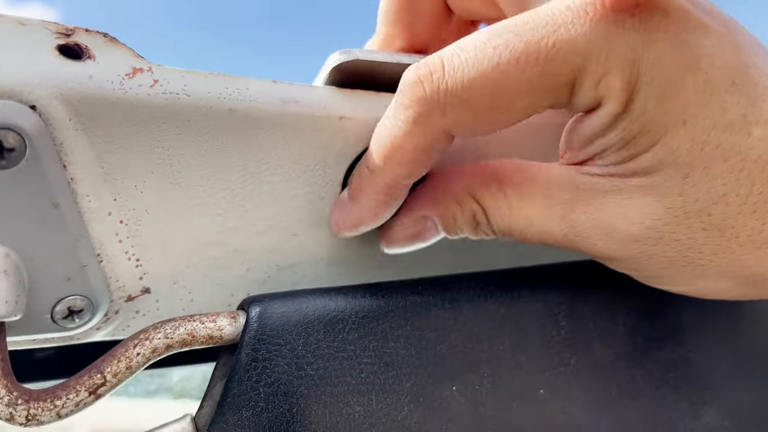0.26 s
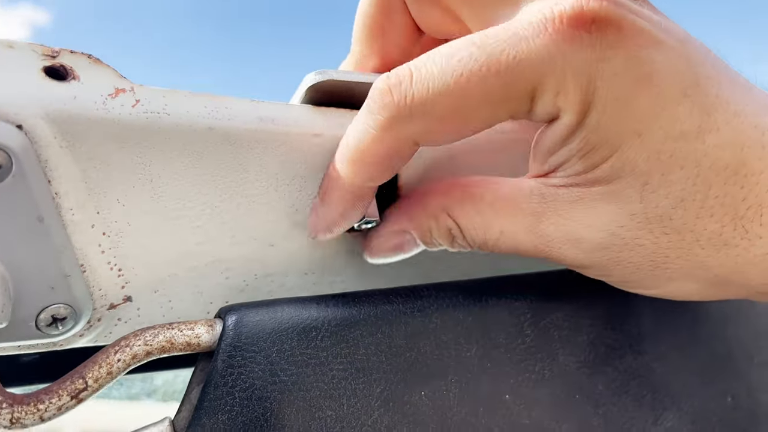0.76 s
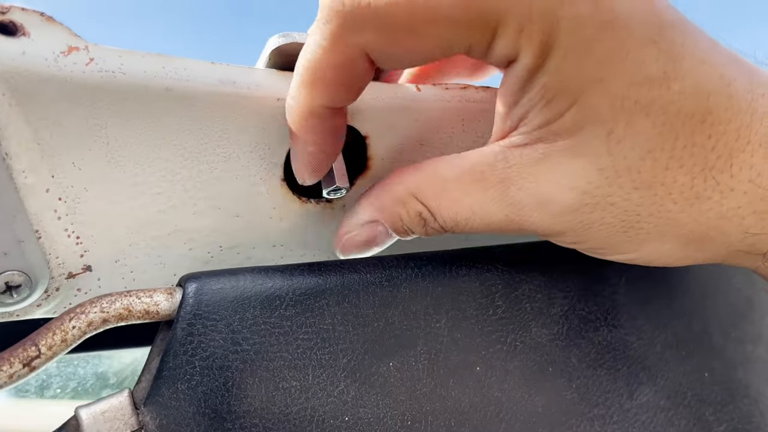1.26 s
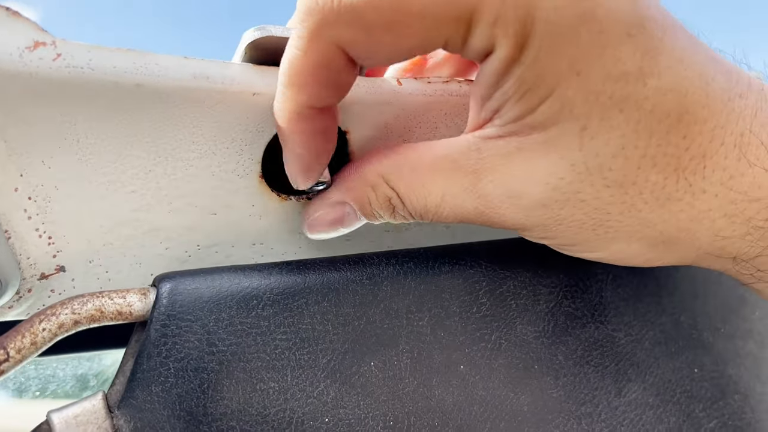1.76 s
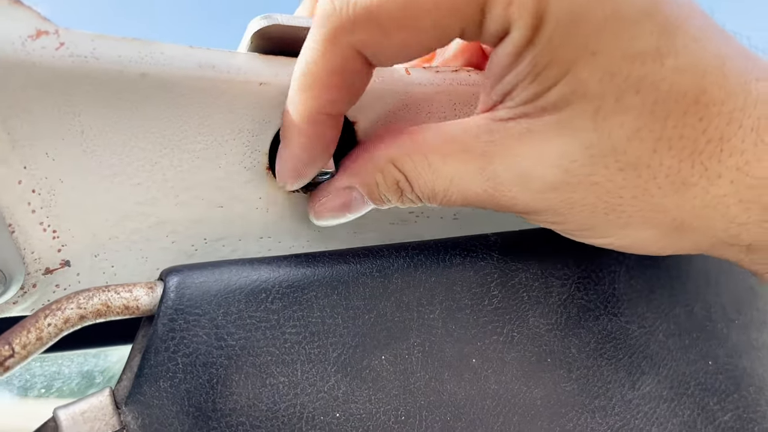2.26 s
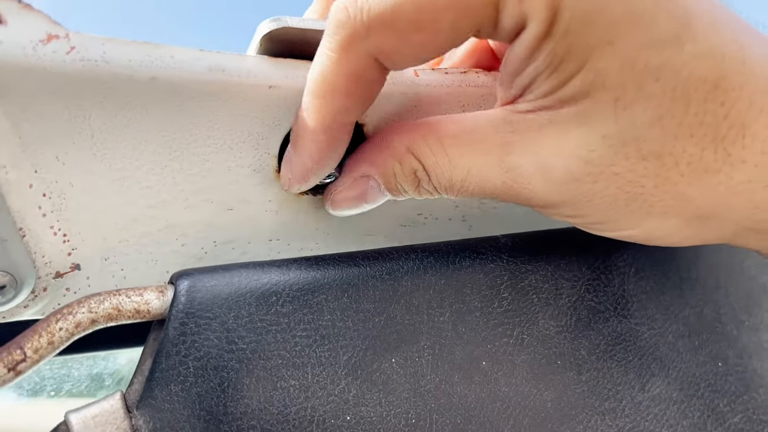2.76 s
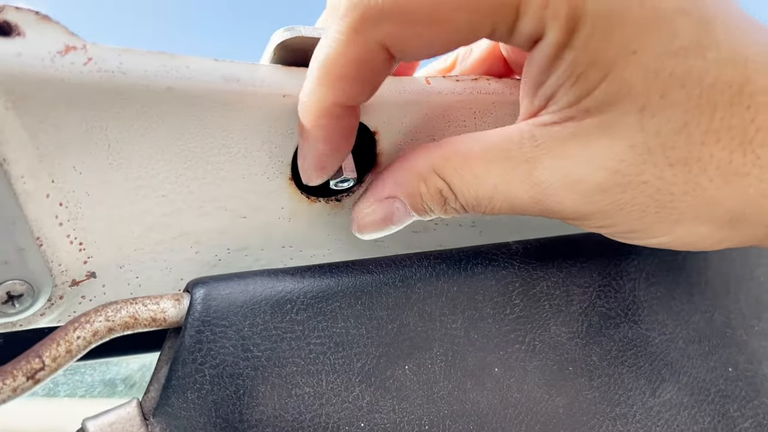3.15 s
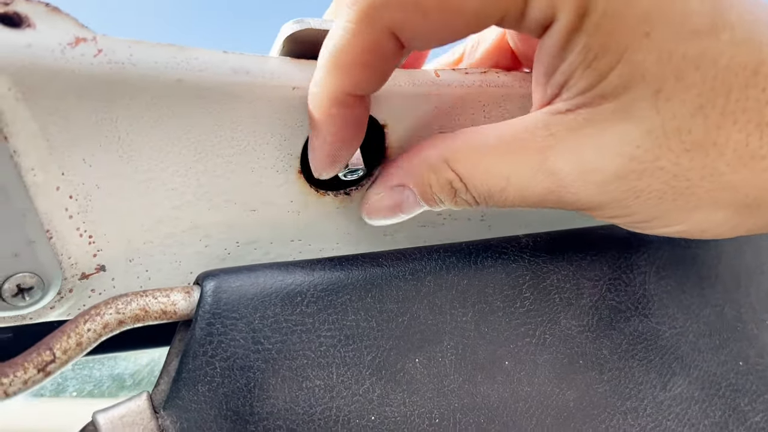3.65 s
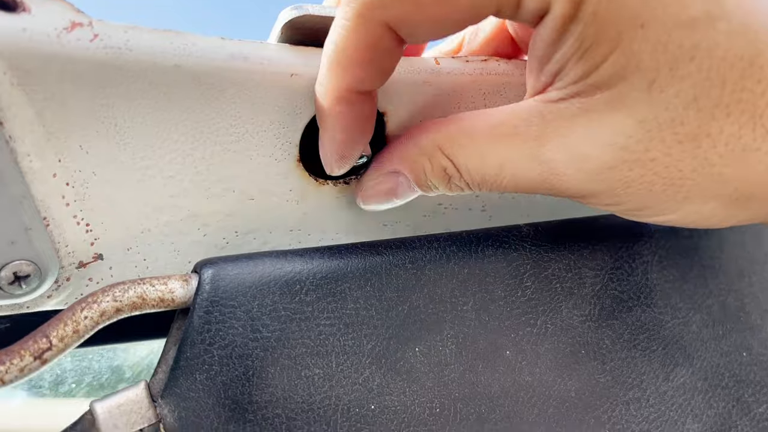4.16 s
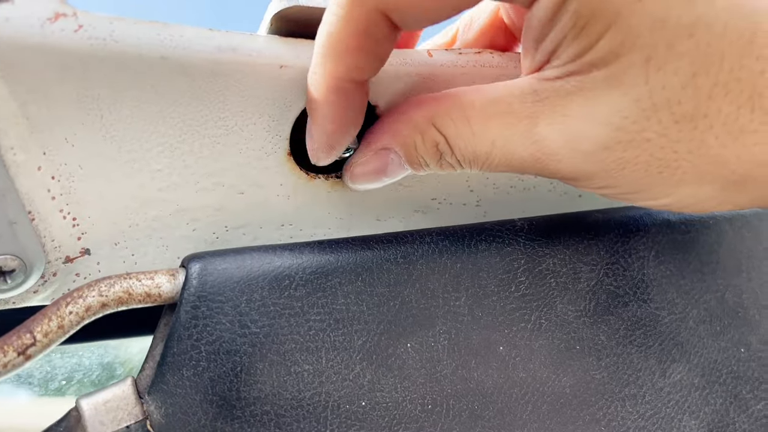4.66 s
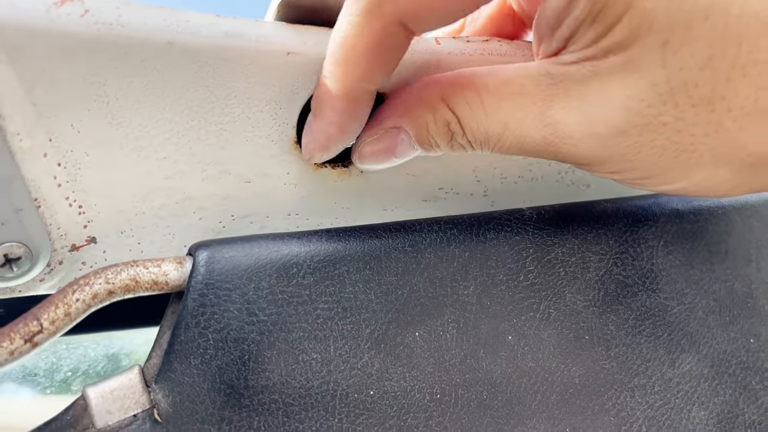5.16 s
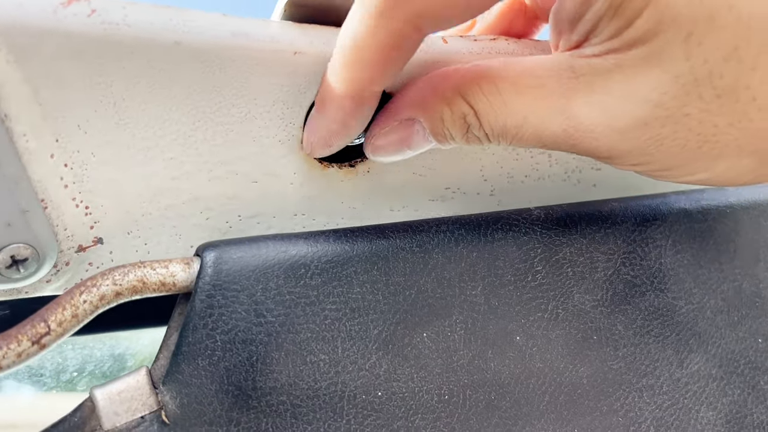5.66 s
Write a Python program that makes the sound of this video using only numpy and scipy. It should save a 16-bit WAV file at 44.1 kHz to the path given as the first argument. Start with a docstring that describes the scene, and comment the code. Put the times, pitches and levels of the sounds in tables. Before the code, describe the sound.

Very close to the microphone, fingers turn a small nut on a bolt inside a hollow steel frame. Irregular clicks and short gritty scrapes run throughout, coloured by brief metallic resonance. Thin, very high rings follow some knocks after two seconds, and one harder knock shudders the panel near the end. Skin rustles softly; a deep machine hum swells and fades behind.

```python
"""Fingers spin a small nut onto a bolt inside a hollow steel frame, close to the microphone.
From the start each push scrapes along the thread as noisy grains and ticks, and the nut knocks in its play;
the frame's resonances and dense reflections colour both, over a soft rustle of skin on the panel.
From about two seconds some knocks leave a thin, very high ring; near the end the hardest one shudders the panel.
Behind, slightly to the right, two low machine lines swell and fade in a bed of noisy air."""
import sys
import numpy as np
from scipy import signal
from scipy.fft import rfft, irfft, next_fast_len
from scipy.io import wavfile
from scipy.ndimage import uniform_filter1d

SR = 44100
rng = np.random.default_rng(int(sys.argv[2]) if len(sys.argv) > 2 else 0)


def wav_out(sig):
    """Save sig, one row per channel (or a flat mono array), as 16-bit PCM at SR to the path in sys.argv[1]."""
    wavfile.write(sys.argv[1], SR, np.round(np.clip(np.atleast_2d(sig).T, -1, 1) * 32767).astype(np.int16))


N = 260586

# How alike the two sides hear the air and the rubbing. Each row: frequency in Hz, likeness from -1 to 1.
AIR_LIKENESS = [(60, 0.74), (130, 0.94), (290, 0.86), (640, -0.18), (3000, -0.17), (6000, 0.49),
                (7500, 0.51), (13000, 0.02)]


def from_db(db):
    """Decibels to gain."""
    return 10 ** (np.asarray(db) / 20)


def rms_one(x):
    """Scale to rms 1."""
    return x / np.sqrt(np.mean(x ** 2) + 1e-20)


def unit_energy(x):
    """Scale each stereo piece to a mean energy of 1 per channel."""
    return x / np.sqrt(np.sum(x ** 2, axis=(-2, -1), keepdims=True) / 2 + 1e-20)


def in_time(rows):
    """Read a table of seconds and values at every sample."""
    s, value = np.transpose(rows)
    return np.interp(np.arange(N) / SR, s, value)


def at_hz(points, hz):
    """Read a table on a log-frequency axis."""
    f, value = np.transpose(points)
    return np.interp(np.log(hz + 1), np.log(f), value)


def band(x, low_hz, high_hz):
    """Causal band-pass."""
    edges_hz = [low_hz, min(high_hz, .45 * SR)]
    return signal.sosfilt(signal.butter(2, edges_hz, "band", fs=SR, output="sos"), x)


def drift(rate):
    """Random curve of rms 1, with straight lines between `rate` chance values per second."""
    knots = rng.standard_normal(N // 40)
    return rms_one(np.interp(np.arange(N) / SR * rate, np.arange(len(knots)), knots))


def add(out, s, sound):
    """Mix a sound in at time s."""
    i = max(round(s * SR), 0)
    out[..., i:i + sound.shape[-1]] += sound[..., :max(N - i, 0)]


def stereo_noise(spectrum, likeness, size, count=1, balance=((1, 0),)):
    """Pieces of coloured noise whose two sides are partly alike and may lean to one side; rms 1."""
    hz = np.arange(size // 2 + 1) * SR / size
    mid, side = rfft(rng.standard_normal((2, count, 1, size), dtype=np.float32))
    alike = np.clip(at_hz(likeness, hz), -1, 1)
    sides = np.array([[1], [-1]])   # left, right
    both = np.sqrt(1 + alike) * mid + np.sqrt(1 - alike) * side * sides
    colour_db = at_hz(spectrum, hz) + at_hz(balance, hz) * sides / 2
    return rms_one(irfft(both * from_db(colour_db), size))


def knocks(modes, level_db=-.5, chatter_s=0.002, swell_s=0.0017, first=0.74, size=2400):
    """The nut grazes a thread flank, seats a few milliseconds later and rattles briefly before it settles."""
    # Knocks of the nut in its play. Each row: start in seconds, relative level in dB,
    # hardness in dB of extra treble before each band's own scaling.
    knock_rows = [(0.02, -55.5, -8), (0.0759, -53, -1), (0.132, -50, -2), (0.216, -44, 1.5),
                  (0.349, -52, -1.5), (0.389, -61, -3.5), (0.4173, -58.5, -5), (0.4996, -51, 1),
                  (0.5304, -63, -2), (0.624, -57.5, 2), (0.633, -49.5, -4), (0.702, -53, 2),
                  (0.7933, -50, 1.5), (0.845, -60, -17), (0.949, -54, -3.5), (0.9773, -47, 0.5),
                  (1.014, -59.5, -2.5), (1.096, -49.5, 2), (1.1809, -50, -3), (1.228, -62, -2),
                  (1.267, -52.5, -3.5), (1.382, -53, -1.5), (1.455, -60, -12), (1.488, -51.5, 0),
                  (1.538, -50.5, 1.5), (1.659, -46.5, 1.5), (1.727, -52.5, -9.5), (1.763, -49, -0.5),
                  (1.792, -55, -5), (1.8216, -60.5, 0), (1.9172, -48.5, 1), (1.9633, -56.5, -5),
                  (1.984, -59, -7), (2.0351, -51, 0), (2.058, -54, 0), (2.079, -54, 0), (2.208, -43.5, 0),
                  (2.2668, -48, -3), (2.2896, -52, -1), (2.3157, -50.5, -3.5), (2.3573, -52.5, 2),
                  (2.4674, -44.5, 1.5), (2.489, -62, -8), (2.629, -56.5, 1), (2.64, -60, 2.5),
                  (2.7216, -48, 2.5), (2.744, -47.5, -0.5), (2.761, -62, -11), (2.837, -45, 0.5),
                  (2.87, -51, -1), (2.899, -55, 1), (2.924, -49.5, 0), (2.952, -47, 1.5),
                  (2.9815, -52.5, 3), (2.995, -52, -3), (3.014, -53.5, -1.5), (3.05, -61, -9),
                  (3.1, -49.5, 1), (3.177, -57, 0), (3.197, -59.5, 0.5), (3.2583, -48.5, 2.5),
                  (3.283, -47, -1.5), (3.32, -54.5, -9), (3.351, -61, -0.5), (3.389, -52, -1.5),
                  (3.421, -56, 2), (3.435, -49, 2.5), (3.457, -57, -5), (3.5023, -50.5, 1.5),
                  (3.515, -54, -4.5), (3.5715, -55, -4.5), (3.593, -56.5, -8), (3.619, -56, -4),
                  (3.686, -54, -0.5), (3.768, -48.5, 1), (3.797, -51.5, -2.5), (3.809, -53.5, 0),
                  (3.886, -50, -1), (3.909, -57, -2), (3.934, -57.5, 0), (4.0307, -48.5, 1.5),
                  (4.178, -56, -5), (4.222, -52, 1), (4.251, -57, -3), (4.332, -50.5, 1), (4.4546, -47, 0),
                  (4.482, -51, -3.5), (4.4987, -56, 1), (4.52, -56, -6), (4.553, -59, -5),
                  (4.6234, -50.5, 0), (4.648, -66, -5), (4.7419, -51.5, 2.5), (4.765, -52.5, 0),
                  (4.856, -46.5, 0.5), (4.881, -64, -6), (4.906, -59, -9), (4.9595, -49.5, -2),
                  (5.014, -56, 0.5), (5.032, -51, -3), (5.045, -57.5, 1), (5.14, -52, 0), (5.1634, -54, -6),
                  (5.259, -50, -1), (5.2638, -48.5, 3), (5.274, -42.5, 2.7), (5.3027, -54, 1.5),
                  (5.3322, -52, -0.5), (5.4076, -53.5, -1.5), (5.4922, -51, -3.5), (5.546, -59, 0.5),
                  (5.681, -52.5, -1), (5.7978, -49.5, -6)]
    # Thud, body, clack, clink, ting and edge of a knock. Each row: low edge in Hz, high edge in Hz,
    # relative level in dB, dB gained per dB of hardness.
    knock_bands = [(233, 460, -14.5, 1.5), (1327, 1800, -0.7, -0.54), (2346, 3610, -1.18, 0.2),
                   (4670, 6020, -2.5, 1.52), (6650, 7390, -4.5, 2), (11460, 15000, -13.5, 5)]
    edge_t60_s = 0.075       # extra decay of the topmost band
    strike_spread_db = 1.3   # no two knocks strike the same spot
    knock_s = 0.018          # a band's level is its rms over this time

    t, out = np.arange(modes.shape[1]) / SR, np.zeros((2, N))
    times, db, hardness_db = np.transpose(knock_rows)
    shape = (len(times), 1, size)
    sparse = rng.standard_normal(shape) * (rng.random(shape) < .08)
    contacts = sparse * (1 - np.exp(-t[:size] / swell_s))
    contacts[..., 0] = first   # the graze
    contacts = unit_energy(contacts * np.exp(-t[:size] / chatter_s)) + rattle(len(times), size)
    frames = frame_response(modes, len(times))
    rung = signal.fftconvolve(frames, contacts, axes=-1)[..., :len(t)]

    parts = [band(rung, low_hz, high_hz) for low_hz, high_hz, _, _ in knock_bands]
    parts[-1] = parts[-1] * from_db(-60 * t / edge_t60_s)   # the very top dies first
    sounds = 0
    for part, (_, _, band_db, slope) in zip(parts, knock_bands):
        spread_db = strike_spread_db * rng.standard_normal(len(db))
        gain = from_db(level_db + db + band_db + slope * hardness_db + spread_db)
        sounds = sounds + unit_energy(part) * gain[:, None, None]
    for s, sound in zip(times, sounds):
        add(out, s, np.sqrt(knock_s * SR) * sound)
    return out


def rattle(count, size, order=4, bounce_s=0.008, first_db=-10, loss_db=6.0):
    """After a knock the loose nut bounces a few times at uneven steps, on the whole ever more weakly."""
    out, rows = np.zeros((count, 1, size)), np.arange(count)[:, None]
    steps = np.cumsum(bounce_s * rng.uniform(.4, 1.4, (count, order)), axis=1)
    db = first_db - loss_db * np.arange(order) + rng.normal(0, 3.7, steps.shape)
    places = np.clip((steps * SR).astype(int), 0, size - 1)
    out[rows, 0, places] = from_db(db) * rng.choice([-1, 1], steps.shape)
    return out


def scraping(modes, level_db=-2.5, grains_per_s=1500, grain_db=5, slip_db=3.5, slips_per_s=130,
             dull_hz=5000, thin_hz=1200, touch_db=-65.0, touch_hz=(1250, 1800), size=6000):
    """Rough thread flanks catch and slip: dense tiny contacts and coarser, uneven ticks shake the frame."""
    sizes = from_db(grain_db * np.minimum(rng.exponential(1, N), 3)) * rng.choice([-1, 1], N)
    grains = sizes * (rng.random(N) < grains_per_s / SR)
    # burrs on the thread tick between the fine grains
    ticks_per_s, tick_size = 150, 11   # nominal rate; size against a small grain
    burrs_passed = np.floor(np.cumsum(ticks_per_s * from_db(5 * drift(70))) / SR)
    ticks = tick_size * np.diff(burrs_passed, prepend=0)
    friction = (grains + ticks) * from_db(slip_db * drift(slips_per_s))
    # the fingers keep the mean friction steady, however the single slips fall
    mean_power = np.abs(uniform_filter1d(friction ** 2, size=1200))
    friction = friction / np.sqrt(mean_power + 1e-6)
    # a push scrapes brightly; a light touch throughout only stirs the lowest strong resonances
    scrape = from_db(level_db) * friction * finger_push()
    force = scrape + from_db(touch_db) * band(rms_one(grains), *touch_hz)

    starts, out = range(0, N, size), np.zeros((2, N))
    # sliding contacts get a slightly stronger direct sound and a weaker near echo than knocks
    frames = frame_response(modes, len(starts), direct_db=4, echo_db=-1, modes_db=-4)
    for i, frame in zip(starts, unit_energy(band(frames, thin_hz, dull_hz))):
        add(out, i / SR, signal.fftconvolve(frame, force[None, i:i + size], axes=1))
    return out


def finger_push(rest_db=-74):
    """Force on the nut: each push grips, swells and is released; a light touch remains in between."""
    # Pushes that drive the nut along the thread. Each row: start in seconds, length in seconds,
    # relative level in dB as the push takes hold.
    strokes = [(0.008, 0.077, -53), (0.305, 0.05, -48.5), (0.372, 0.079, -65.5), (0.574, 0.057, -48.5),
               (0.71, 0.027, -69), (0.838, 0.038, -61.5), (0.913, 0.072, -55.5), (1.003, 0.078, -65),
               (1.142, 0.054, -58.5), (1.387, 0.021, -57), (1.435, 0.091, -53.5), (1.718, 0.069, -52),
               (1.807, 0.035, -63), (1.955, 0.11, -55.5), (2.194, 0.18, -57), (2.377, 0.035, -59.5),
               (2.452, 0.14, -55), (2.62, 0.03, -53), (2.729, 0.043, -51.5), (2.81, 0.14, -55),
               (2.974, 0.019, -45.5), (3.042, 0.099, -54.5), (3.161, 0.033, -56), (3.244, 0.21, -53.5),
               (3.497, 0.013, -48.5), (3.561, 0.06, -57), (3.645, 0.023, -62), (3.677, 0.044, -52.5),
               (3.759, 0.056, -48.5), (3.882, 0.027, -49), (4.048, 0.11, -61), (4.174, 0.08, -53),
               (4.326, 0.071, -57.5), (4.435, 0.086, -52.5), (4.544, 0.032, -59.5), (4.596, 0.072, -52),
               (4.684, 0.065, -47), (4.929, 0.075, -50.5), (5.129, 0.037, -56), (5.203, 0.042, -51.5),
               (5.258, 0.022, -41), (5.291, 0.037, -45), (5.476, 0.11, -56), (5.729, 0.11, -62),
               (5.801, 0.056, -61.5)]
    grip_s, press_db, release_s = 0.0062, 4, 0.006   # rise time, swell over the push, decay constant

    t, push = np.arange(SR // 2) / SR, np.full(N, from_db(rest_db))
    for start, length, db in strokes:
        press = from_db(db + press_db * np.minimum(t / length, 1))
        grip = np.minimum(t / grip_s, 1)
        release = np.exp(-np.maximum(t - length, 0) / release_s)
        add(push, start, press * grip * release)
    return push


def frame_response(modes, count, t60=0.093, tail_t60=0.56, tail_db=-22, modes_db=-4, direct_db=3,
                   echo_db=1, echo_s=0.0071, burst_t60=0.0042):
    """The frame answers contacts with a crisp direct sound, a near echo, resonances and dense reflections."""
    # Dense reverberation inside the frame. Each row: frequency in Hz, relative density in dB per Hz.
    cavity = [(150, -18), (340, -3), (700, 9), (1100, 4), (1450, 3.5), (2000, 1), (2700, -1.5),
              (3300, -8.5), (4100, -3), (5100, -15.5), (6000, -12), (8200, -2), (10000, -15.5),
              (11800, -32), (14000, -23), (16000, -36)]
    # How alike its two sides are. Each row: frequency in Hz, likeness from -1 to 1.
    cavity_likeness = [(300, 1), (750, 0.67), (1400, -0.18), (3000, 0.62), (6000, -0.46), (8000, 0.065),
                       (13000, 0.61)]
    # It leans left in the middle range. Each row: frequency in Hz, left minus right in dB.
    cavity_balance = [(300, -6), (600, 1.5), (1400, 7.5), (2700, -0.5), (4500, 7), (7000, 1), (13000, -3)]

    t = np.arange(modes.shape[1]) / SR
    fade = from_db(-60 * t / t60) + from_db(tail_db - 60 * t / tail_t60)
    for s, db in ((0, direct_db), (echo_s, echo_db)):
        fade = fade + (t >= s) * from_db(db - 60 * np.abs(t - s) / burst_t60)
    # fresh noise for each piece: the reflections change as the nut moves
    dense = stereo_noise(cavity, cavity_likeness, len(t), count, cavity_balance) * fade
    return unit_energy(dense) + from_db(modes_db) * modes


def frame_modes(size):
    """The clear resonances of the frame: decaying sines with a level and phase for each side."""
    # Each row: frequency in Hz, decay time t60 in seconds, relative strength in dB,
    # left minus right in dB, left lead in radians.
    frame_rows = [(346, .1, -14, -1, 0), (1075, .08, -12, 3, 2), (1382, .06, -1, 3, -.4),
                  (1450, .05, -6, 5, -.4), (1606, .06, -7, 3, 0), (1700, .05, -9, 2, 0),
                  (1811, .08, -8, 0, 0), (2448, .07, -5, 0, .5), (2571, .06, -6, 0, .5),
                  (2720, .05, -8, 1, .5), (2860, .05, -8, 2, .5), (3215, .05, -3, 2, 1),
                  (3640, .05, -10, 5, .5), (3900, .07, -11, 6, 0), (4480, .06, -13, 7, 0),
                  (4650, .06, -8, 9, 0), (5120, .05, -15, 5, 0), (5355, .04, -14, 10, .2),
                  (5680, .04, -13, -4, -1), (6298, .07, -12, 1, 0), (6503, .06, -11, 2, 0),
                  (6829, .08, -9, 0, 0), (6993, .06, -9, 2, 0), (7310, .05, -12, 0, 0)]
    t, sides, modes = np.arange(size) / SR, np.array([[.5], [-.5]]), 0
    for hz, t60, db, pan_db, lead in frame_rows:
        phase = 2 * np.pi * (hz * t + rng.random()) + lead * sides
        fade = from_db(db + pan_db * sides - 60 * t / t60)
        modes = modes + fade * np.sin(phase) / np.sqrt(t60)
    return unit_energy(modes)


def nut_ring(level_db=0, bend_hz=70, settle_s=0.022):
    """Two close, very high partials ring on after some knocks, a little sharp at first, each wavering alone."""
    # The nut rings when it swings free of the fingers. Each row: start in seconds,
    # lower partial in dB, upper partial in dB, decay time t60 in seconds.
    pings = [(2.058, -71, -68, 0.92), (2.29, -84, -71, 1), (2.469, -69, -58.5, 0.37),
             (2.64, -74, -63, 0.49), (2.735, -66, -62, 1), (2.981, -79, -76, 0.72), (3.101, -76, -72, 0.37),
             (3.18, -71, -84, 0.44), (3.259, -74, -69, 0.4), (3.434, -70, -60.5, 0.75),
             (3.801, -65, -80, 0.88), (4.222, -63.5, -76, 0.51), (4.455, -72, -68, 0.8),
             (4.625, -61, -62, 0.99), (4.742, -52, -56, 0.5), (4.959, -76, -64, 0.73),
             (5.272, -51, -45, 0.12)]
    # The nut's split mode: lower and upper settled frequency in Hz.
    nut_hz = (13183, 13540)
    flicker_db, flickers_per_s = 3.5, 55   # the ring wavers and breaks up as it dies

    t, out = np.arange(SR) / SR, np.zeros((2, N))   # one row per partial
    bend = bend_hz * settle_s * (1 - np.exp(-t / settle_s))   # extra cycles
    for s, lower_db, upper_db, t60 in pings:
        for partial, hz, db in zip(out, nut_hz, (lower_db, upper_db)):
            tone = np.sin(2 * np.pi * (hz * t + bend + rng.random()))
            add(partial, s, from_db(level_db + db - 60 * t / t60) * tone)
    return sum(partial * from_db(flicker_db * drift(flickers_per_s)) for partial in out)


def panel_boom(width_hz=45):
    """The steel panel shudders with the hardest knock: narrow bands of noise die away at its low resonances."""
    # Each row: frequency in Hz, level in dB, decay time t60 in seconds.
    panel = [(266, -52, .22), (338, -50, .22), (720, -60, .2), (960, -59, .2)]
    boom_s = 5.274   # time of the hardest knock
    t, out = np.arange(SR // 2) / SR, np.zeros(N)
    for hz, db, t60 in panel:
        noise = band(rng.standard_normal(SR), hz - width_hz / 2, hz + width_hz / 2)
        shudder = rms_one(noise[-len(t):])   # skip the filter's onset
        add(out, boom_s, from_db(db - 60 * t / t60) * shudder)
    return out


def rubbing(level_db=0):
    """Fingertips slide over the panel: low coloured noise makes a soft rustle."""
    # Skin rubbing on the panel. Each row: time in seconds, level in dB.
    rub = [(0, -71), (1.9, -68), (2.9, -60), (3.5, -65), (4.4, -63.5), (4.9, -100), (5.3, -66.5),
           (5.91, -63)]
    # Colour of the rubbing. Each row: frequency in Hz, relative density in dB per Hz.
    rub_colour = [(180, -11), (260, -0.5), (345, 11.5), (460, 7.5), (580, -12.5), (800, -37)]
    rustle = stereo_noise(rub_colour, AIR_LIKENESS, next_fast_len(N))[0, :, :N]
    return from_db(in_time(rub) + level_db) * rustle


def hum(second_db=-64, third_db=-67, shaft_second_db=-63, waver_db=2.0):
    """Two low machine lines sound against each other and flutter a little, with faint wavering overtones."""
    # Slow swell and fade of the main line. Each row: time in seconds, rms level in dB before flutter.
    main_level = [(0, -38), (0.3, -38.3), (0.5, -36.5), (0.65, -38), (1.1, -35.3), (2.0, -37.7), (2.5, -46),
                  (2.8, -43.5), (3.3, -38.5), (3.9, -40.5), (4.1, -44), (4.38, -46), (4.5, -55),
                  (4.78, -48), (5.1, -37.3), (5.4, -37.5), (5.91, -40)]
    # The same for the slower shaft line. Each row: time in seconds, rms level in dB before flutter.
    shaft_level = [(0, -44.5), (1.9, -48), (2.8, -55.5), (4.2, -53.5), (5, -59), (5.91, -47.5)]
    hum_hz, shaft_hz = 60.15, 45
    flutter_db, flutter_per_s = 1.0, 11   # quick unsteadiness of both lines

    t, out = np.arange(N) / SR, np.zeros(N)
    main, shaft = (2 * np.pi * (hz * t + rng.random()) for hz in (hum_hz, shaft_hz))
    for phase, level in ((main, main_level), (shaft, shaft_level)):
        out += from_db(in_time(level) + flutter_db * drift(flutter_per_s)) * np.sin(phase)
    for phase, db in ((2 * main, second_db), (3 * main, third_db), (2 * shaft, shaft_second_db)):
        out += from_db(db + waver_db * drift(2.86)) * np.sin(phase)
    return np.sqrt(2) * out   # sine amplitude from rms


def background_air(level_db):
    """Steady air of the place: coloured noise, partly alike on the two sides."""
    # Each row: frequency in Hz, relative density in dB per Hz.
    air_colour = [(20, -47), (35, -71), (55, 7), (75, 5), (110, 3), (150, -4), (350, -11), (650, -12.5),
                  (1500, -18), (3000, -32.5), (5800, -36.5), (7400, -17.5), (9800, -46), (13000, -41)]
    return from_db(level_db) * stereo_noise(air_colour, AIR_LIKENESS, next_fast_len(N))[0, :, :N]


def scene(air_db=-52):
    """Nut, fingers and frame in front, hum and air behind and slightly to the right."""
    modes = frame_modes(size=4096)
    left_db = -.5   # the right side gets the opposite
    background = (hum() + background_air(air_db)) * from_db([[left_db], [-left_db]])
    return knocks(modes) + scraping(modes) + nut_ring() + panel_boom() + rubbing() + background


def record(dry, notch_hz=10000, notch_q=4, cutoff_hz=16200):
    """The microphone has a dip in the treble; a steep low-pass cuts the top."""
    dipped = signal.lfilter(*signal.iirnotch(notch_hz, notch_q, fs=SR), dry)
    return signal.sosfilt(signal.ellip(10, .2, 80, cutoff_hz, fs=SR, output="sos"), dipped)


dry = scene()
out = record(dry)
wav_out(out)
```